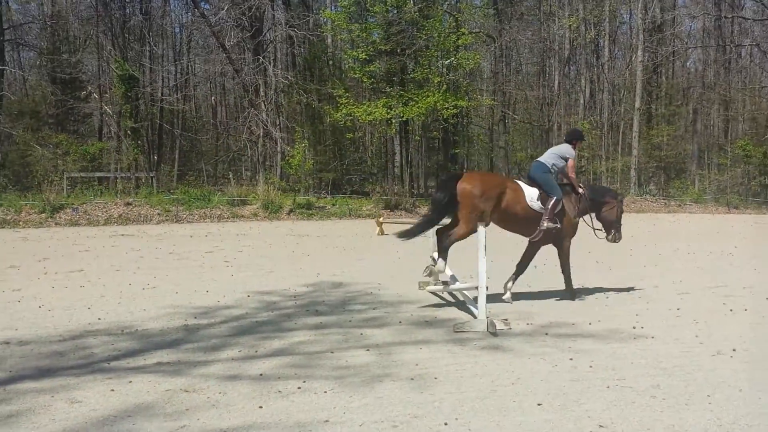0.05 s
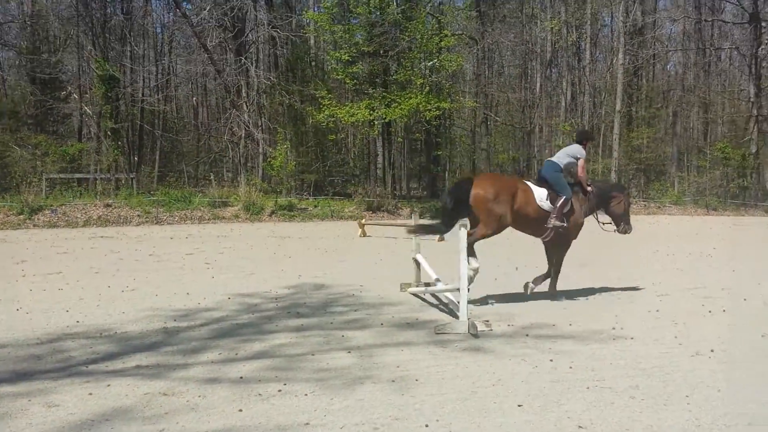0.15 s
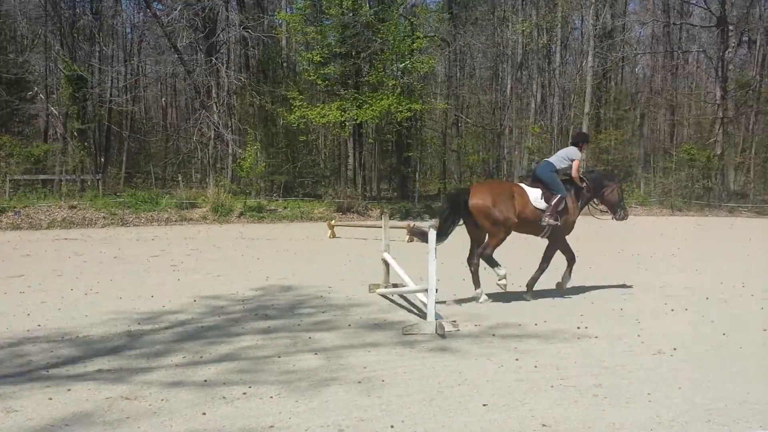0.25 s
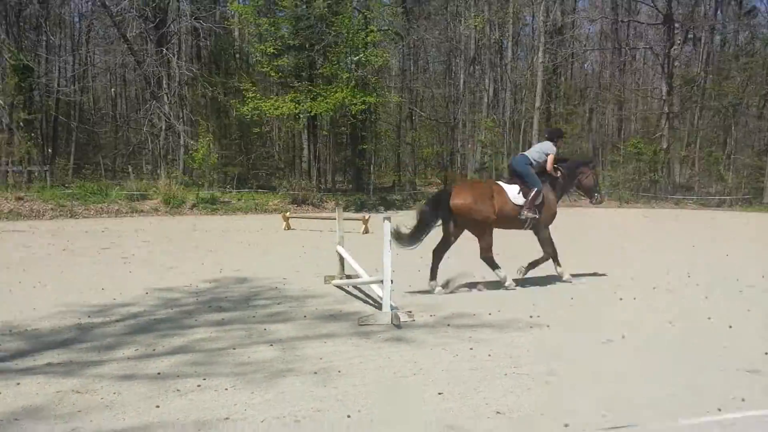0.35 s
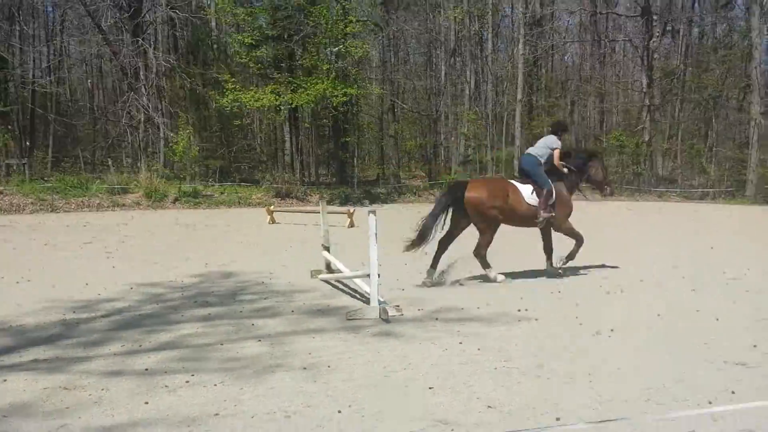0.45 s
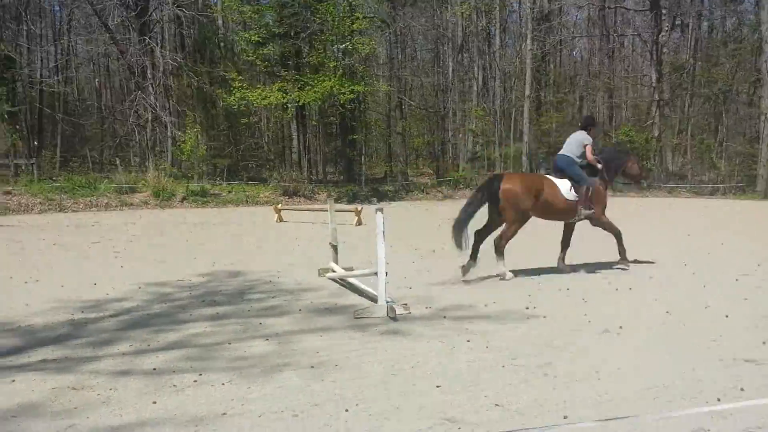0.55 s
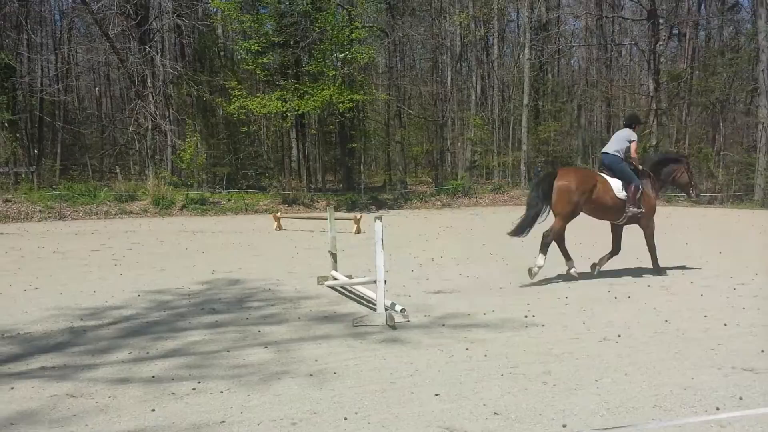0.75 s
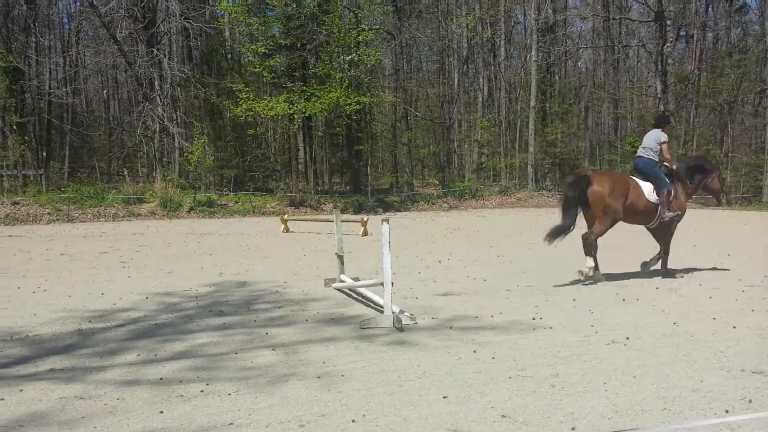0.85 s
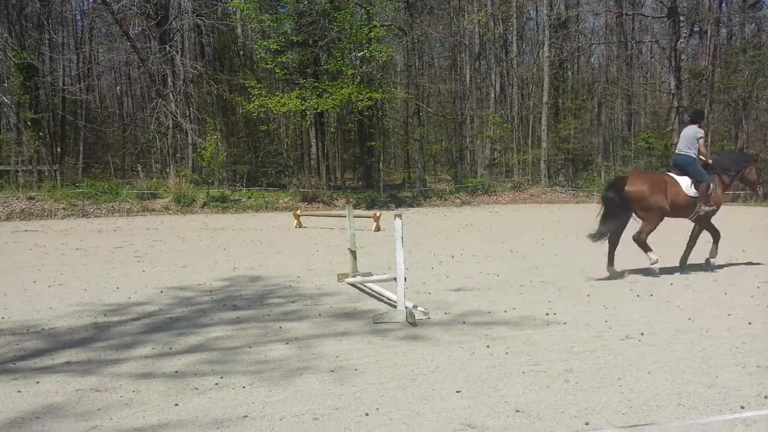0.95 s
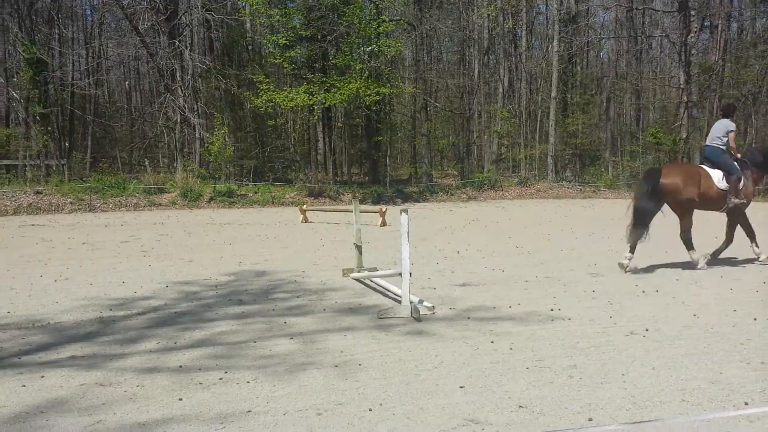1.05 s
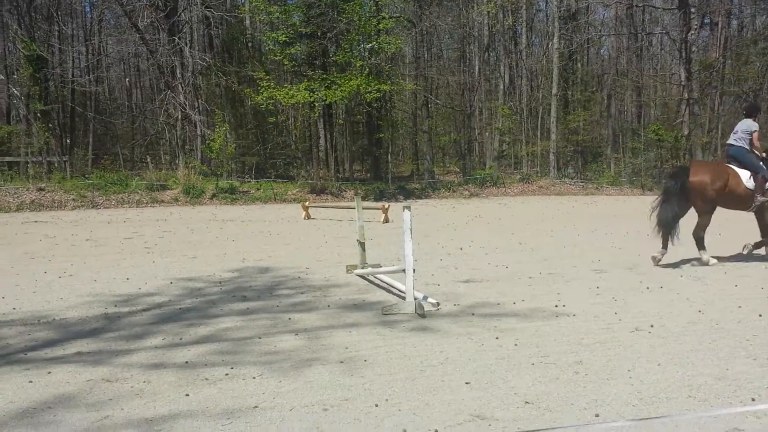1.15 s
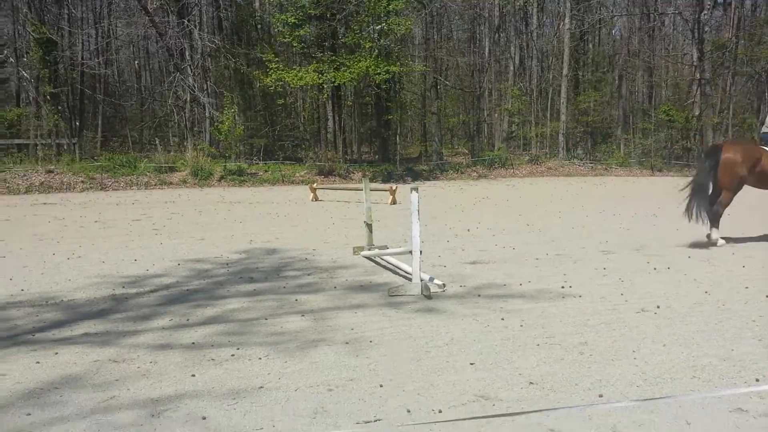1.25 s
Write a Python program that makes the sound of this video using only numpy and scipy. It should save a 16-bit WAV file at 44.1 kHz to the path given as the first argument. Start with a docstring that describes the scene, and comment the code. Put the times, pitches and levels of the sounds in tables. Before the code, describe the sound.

A hoof strikes a wooden jump pole with a loud knock and short rattle, just after soft hoofbeats. The horse canters on across a sandy outdoor arena with dull thuds, a couple of clacks and light sprays of grit.

```python
"""Soft hoofbeats, then one sharp crack: a cantering horse clips a wooden jump rail.
The pole rings in its modes and rattles in its cups. Dull thuds and two hard hoof clacks
follow as the horse moves off over the sand, kicking up grit.
Trees around the arena return an echo and a long thin tail, over a quiet outdoor hush."""
import sys
import numpy as np
from scipy import signal
from scipy.fft import rfft, irfft, next_fast_len
from scipy.io import wavfile
from scipy.ndimage import map_coordinates

SR = 44100
rng = np.random.default_rng(int(sys.argv[2]) if len(sys.argv) > 2 else 0)


def dump(signal):
    """Clip the signal to [-1, 1] and save it as 16-bit WAV at the path in sys.argv[1]."""
    limited = np.clip(np.atleast_2d(signal).T, -1, 1)
    pcm = np.round(limited * 32767).astype(np.int16)
    wavfile.write(sys.argv[1], SR, pcm)


N = 57330

# diffuse sound: f/Hz, left-right coherence
COHERENCE = [(350, .98), (800, .65), (5000, .3), (12000, .1)]
# outdoor air: f/Hz, level/dB
AIR_SPECTRUM = [(20, -1), (60, 6.5), (330, 2.5), (550, -8.5), (3200, -19), (6300, -14.5), (12000, -23),
                (16000, -31)]
# tail from the trees: f/Hz, t60/s
TREE_DECAY = [(100, 0.17), (700, 1.23), (6000, 0.78), (12000, 1.08)]
# colour of that tail: f/Hz, level/dB
TREE_SPECTRUM = [(180, 4), (290, 6.5), (600, -4), (1100, 2), (2300, 0), (3300, 6), (6300, 2), (12000, -7)]
# kicked-up sand: t/s, level/dB, t60/s
SAND_SPRAYS = [(.10, -43.5, 0.12), (0.346, -31.5, 0.14), (0.494, -39, 0.099), (0.658, -42, 0.31),
               (0.937, -40.5, 0.19), (1.069, -44, 0.56), (1.211, -46.5, 0.71)]
# falling grit: f/Hz, level/dB
SAND_SPECTRUM = [(300, -10), (1200, 4.5), (2300, 2.5), (4400, -0.5), (6300, 9.5), (8000, 2.5),
                 (10500, -0.5), (15000, -24)]
# dull blows of hoof and pole: t/s, level/dB, f/Hz, rise/s
DULL_BLOWS = [(.104, -28.5, 180, 0.0037), (0.117, -32, 127, 0.0059), (0.2049, -18.5, 1010, 0.0018),
              (.207, -17, 338, 0.0021), (0.2237, -18, 318, 0.0011), (.362, -17.5, 235, .0036),
              (.378, -23.5, 150, .006), (.507, -32, 198, .004), (.6422, -25.5, 1040, .0018),
              (.6425, -26, 610, .0038), (.647, -14.5, 320, .0028), (.661, -29, 610, .0026),
              (.6645, -24, 320, .0028), (.849, -34, 400, .0028), (.881, -31.5, 340, .004),
              (0.968, -29, 348, 0.0009), (1.0395, -23, 1430, 0.0005), (1.041, -32, 522, 0.0067),
              (1.219, -30.5, 163, 0.0023), (1.23, -27.5, 148, 0.0061)]
# sand crushed under a blow: multiple of the blow's pitch, level/dB
CRUSH_SPECTRUM = [(.2, -22), (.6, -1), (1.1, -5), (2, -6.5), (4, -20), (12, -28), (45, -58)]
# clicks of wood, stones and metal fittings: t/s, level/dB, f/Hz
CLINK_HITS = [(.2425, -25, 2300), (.2675, -29, 2300), (.4595, -36, 2350), (.460, -34, 6200),
              (.645, -34, 2300), (.849, -46.5, 2750), (.9185, -43, 6500), (.963, -46, 5900),
              (1.042, -26, 6100), (1.0765, -40, 6200)]
# hooves and stones: t/s, level/dB, length/s, tilt/(dB/octave)
HOOF_CONTACTS = [(.037, -36, .003, -2), (.090, -38, .0015, -2), (.755, -30, .003, .5),
                 (.6485, -21, .008, .7), (.882, -33, .008, -2), (.968, -34, .012, -4),
                 (1.0418, -10, .011, 0), (1.059, -22, .03, 1)]
# hoof clack: f/Hz, level/dB
HOOF_SPECTRUM = [(150, -20), (550, -2), (1500, -7), (2300, -4), (3300, -12), (4000, -5), (4700, -8),
                 (6200, 4), (8000, -14), (10500, -13), (14500, -46)]
# blows that ring the pole: t/s, level/dB
POLE_STRIKES = [(0.211, -30), (.226, -21.5)]
# pole modes: f/Hz, level/dB, t60/s
POLE_MODES = [(195, -9, .4), (229, -2, .22), (277, -5, .5), (370, 1, .14), (404, -3, .2), (440, -3, .18),
              (483, -2, .18), (545, 1, .2), (644, -4, .15), (785, -5, .17), (1155, -6, .13), (1298, -7, .2)]
# pole in its cups: f/Hz, level/dB
RATTLE_SPECTRUM = [(80, -15), (250, -0.5), (520, 2.5), (700, -7.5), (1200, -6), (1800, -18.5),
                   (6400, -11.5), (10500, -25), (13000, -76)]
# rail against hoof and cups: t/s, level/dB, length/s, tilt/(dB/octave)
RAIL_CONTACTS = [(.2076, 1, .0015, 0), (.2166, -15, .002, 2), (.2248, -11, .003, 1.5), (.2325, -9, .007, 2),
                 (.2425, -15, .006, 0), (.2525, -16, .008, 1), (.2675, -13.5, .007, -2),
                 (.383, -21, .015, -2), (.490, -28, .012, 0)]
# rail crack: f/Hz, level/dB
RAIL_SPECTRUM = [(80, -24), (350, -1), (650, -7), (980, 4), (1220, -8), (1500, -2), (1850, -7), (2250, -2),
                 (3350, -18), (4200, -10), (5300, -7), (6400, 0), (7900, -16), (10000, -11), (12000, -25),
                 (16000, -48)]
# microphone ports: f/Hz, left over right/dB
PORT_BALANCE = [(100, 1.6), (1000, 0.5), (2200, 5), (4500, 2), (6500, 6), (8000, -2.5), (9800, -14),
                (13000, -7)]


def amp(db):
    """Decibels to gain."""
    return 10 ** (np.asarray(db) / 20)


def along(points, hz):
    """(f/Hz, value) points read on a log axis."""
    f, values = np.transpose(points)
    return np.interp(np.log(hz + 1), np.log(f + 1), values)


def since(start_s):
    """Seconds since start_s, zero before."""
    return np.maximum(np.arange(N) / SR - start_s, 0)


def fade(t, t60_s):
    """Exponential decay, on for t > 0."""
    return (t > 0) * amp(-60 * t / t60_s)


def filtered(x, response):
    """Apply a frequency response by FFT."""
    size = 2 * next_fast_len(N)
    return irfft(rfft(x, size) * response(np.fft.rfftfreq(size, 1 / SR)), size)[..., :N]


def coloured(x, spectrum, tilt_db_oct=0):
    """Minimum-phase filter of unit energy, tilted above 500 Hz."""
    size = 4096
    hz = np.fft.rfftfreq(size, 1 / SR)
    level_db = along(spectrum, hz) + tilt_db_oct * np.log2(1 + hz / 500)
    cepstrum = irfft(np.log(amp(level_db)))
    cepstrum[1:size // 2] *= 2
    cepstrum[size // 2 + 1:] = 0
    impulse = irfft(np.exp(rfft(cepstrum)))
    return signal.fftconvolve(x, impulse[None] / np.linalg.norm(impulse), axes=1)[:, :N]


def spread(pair):
    """Two unrelated signals to stereo at rms 1: joined in the bass, apart in the treble."""
    def mid_side_gains(hz):
        angle = np.arccos(along(COHERENCE, hz)) / 2
        return np.array([np.cos(angle), np.sin(angle)])
    mid, side = filtered(pair, mid_side_gains)
    stereo = np.array([mid + side, mid - side])
    return stereo / np.sqrt(np.mean(stereo ** 2) + 1e-20)


def noise():
    """Diffuse white noise."""
    return spread(rng.standard_normal((2, N)))


def grains(rate_per_s, scatter_db):
    """Random tiny impacts of uneven size."""
    size = amp(scatter_db * np.clip(rng.standard_normal((2, N)), -2, 2))
    sign = rng.choice([-1, 1], (2, N))
    hits = rng.random((2, N)) < rate_per_s / SR
    return spread(size * sign * hits)


def hush(level_db=-50, waver_db=1, waver_per_s=14):
    """Quiet, slightly wavering outdoor air."""
    waver = map_coordinates(rng.standard_normal(64), [np.arange(N) * waver_per_s / SR], mode="mirror")
    return amp(level_db + waver_db * waver) * coloured(noise(), AIR_SPECTRUM)


def trees(x, send_db=-11.5, echo_s=0.19, echo_width_s=0.042, echo_db=-3.5):
    """Trunks scatter sound into a long tail; the tree line adds a soft echo."""
    hz, t, bins = signal.stft(noise(), SR, nperseg=256)
    echo = 1 + amp(echo_db) * np.exp(-((t - echo_s) / echo_width_s) ** 2)
    decay = amp(-60 * t / along(TREE_DECAY, hz)[:, None])
    tail = signal.istft(bins * echo * decay, SR, nperseg=256)[1][:, :N]
    tail = filtered(tail / np.linalg.norm(tail[0]), lambda f: amp(along(TREE_SPECTRUM, f)))
    return amp(send_db) * signal.fftconvolve(x.mean(0)[None], tail, axes=1)[:, :N]


def sand(rise_per_t60=0.073):
    """Grit thrown up by the hooves patters down."""
    envelope = np.zeros(N)
    for start_s, db, t60_s in SAND_SPRAYS:
        t = since(start_s)
        envelope += amp(db) * np.minimum(t / (rise_per_t60 * t60_s), 1) * fade(t, t60_s)
    return coloured(grains(rate_per_s=2600, scatter_db=5) * envelope, SAND_SPECTRUM)


def clinks(rise_s=0.0018, skirt_db=-42):
    """Small hard things ring for a few milliseconds, each in one broad resonance."""
    out = np.zeros((2, N))
    for start_s, db, hz in CLINK_HITS:
        age = since(start_s) / rise_s
        resonance = [(hz / 2, skirt_db), (hz, 0), (2 * hz, skirt_db)]
        out += amp(db) * age * np.exp(1 - age) * coloured(noise(), resonance)
    return out


def thuds(crush_db=-9.5, crush_t60_s=0.075):
    """Heavy blows swell and die in a few cycles, crushing sand."""
    out = np.zeros((2, N))
    for start_s, db, hz, rise_s in DULL_BLOWS:
        t = since(start_s)
        age = t / rise_s
        push = age ** 2 * np.exp(2 * (1 - age)) * np.sin(2 * np.pi * hz * t)
        burst = noise() * np.minimum(age, 1) * fade(t, crush_t60_s)
        crush = coloured(burst, np.array(CRUSH_SPECTRUM) * [hz, 1])
        out += amp(db) * (push + amp(crush_db) * crush)
    return out


def pole_rattle(start_s=0.2152, rise_s=0.0098, hold_s=0.031, t60_s=0.17, level_db=-24):
    """The pole shakes in its cups: dense tiny impacts."""
    t = since(start_s)
    shake = np.minimum(t / rise_s, 1) * amp(-60 * np.maximum(t - hold_s, 0) / t60_s)
    return amp(level_db) * coloured(grains(rate_per_s=1800, scatter_db=2) * shake, RATTLE_SPECTRUM)


def pole_ring(rise_s=0.0031):
    """The struck pole rings in decaying modes."""
    out = np.zeros(N)
    for start_s, strike_db in POLE_STRIKES:
        t = since(start_s)
        attack = 1 - np.exp(-t / rise_s)
        for hz, mode_db, t60_s in POLE_MODES:
            mode = np.sin(2 * np.pi * (hz * t + rng.random()))
            out += 0.5 * amp(strike_db + mode_db) * attack * fade(t, t60_s) * mode
    return out


def knocks(contacts, body_spectrum, splinter_db=2, chatter_db=-10, chatter_t60_s=0.05, push_s=0.0015):
    """Hard contacts: push, splintery burst and chatter, coloured by the struck body."""
    out = np.zeros((2, N))
    for start_s, db, length_s, tilt_db_oct in contacts:
        t = since(start_s)
        splinter = noise() * fade(t, 2 * length_s)
        chatter = noise() * fade(t, chatter_t60_s)
        force = amp(splinter_db) * splinter / np.linalg.norm(splinter[0])
        force += amp(chatter_db) * chatter / np.linalg.norm(chatter[0])
        force[:, round(start_s * SR)] += min(1, push_s / length_s)  # longer contact, weaker push
        out += 2 * amp(db) * coloured(force, body_spectrum, tilt_db_oct)
    return out


def scene():
    """Rail and hooves in the open arena."""
    rail = knocks(RAIL_CONTACTS, RAIL_SPECTRUM) + pole_ring() + pole_rattle()
    hooves = knocks(HOOF_CONTACTS, HOOF_SPECTRUM) + thuds() + clinks()
    tail = trees(rail + amp(-4) * hooves)  # ground-level sound reaches the trees more weakly
    return rail + hooves + tail + sand() + hush()


def record(dry):
    """Microphone: unequal ports, thinned deep bass, clipping, band limit."""
    low_cut_hz, top_hz, full_scale = 48, 14800, 0.92

    def microphone(hz):
        ports = amp(along(PORT_BALANCE, hz) * np.array([[0.5], [-0.5]]))
        return ports * (hz / (hz - 1j * low_cut_hz)) ** 2
    clipped = np.clip(filtered(dry, microphone), -full_scale, full_scale)
    return filtered(clipped, lambda hz: hz < top_hz)


dry = scene()
out = record(dry)
dump(out)
```